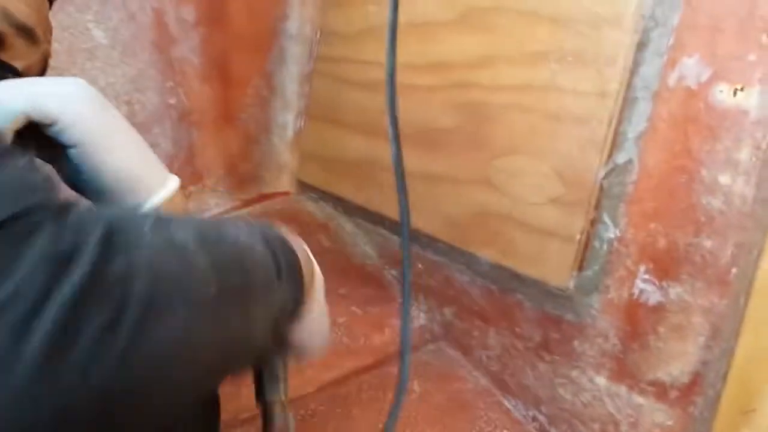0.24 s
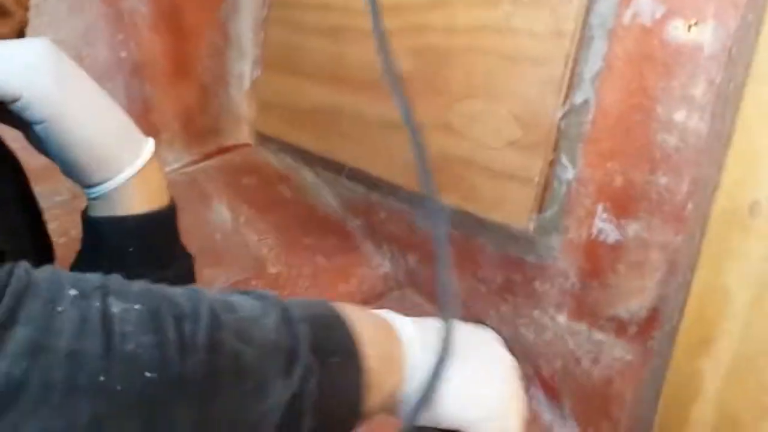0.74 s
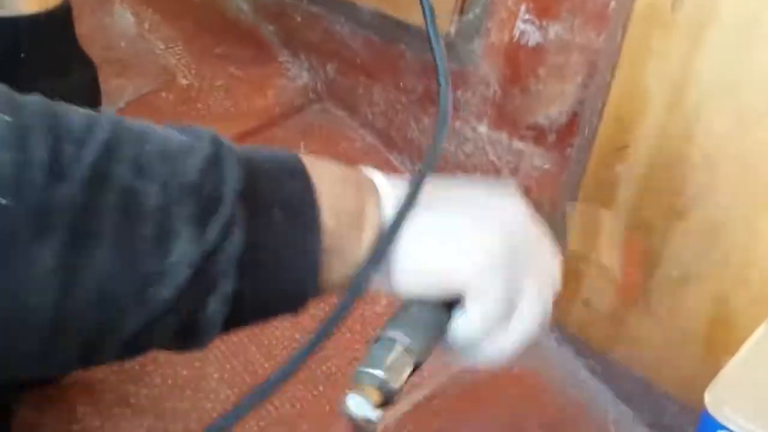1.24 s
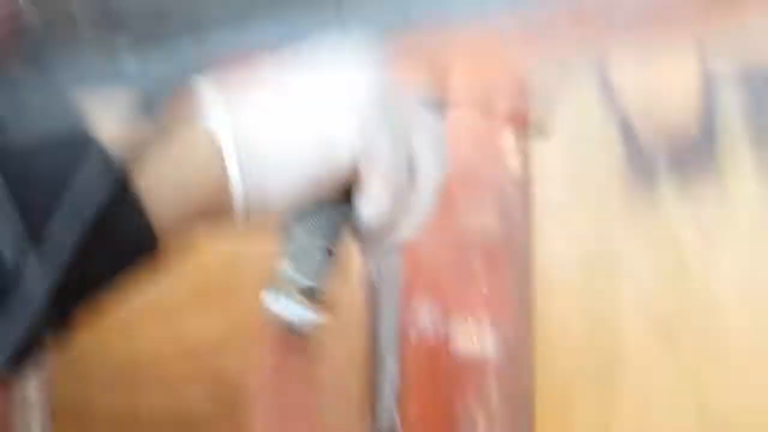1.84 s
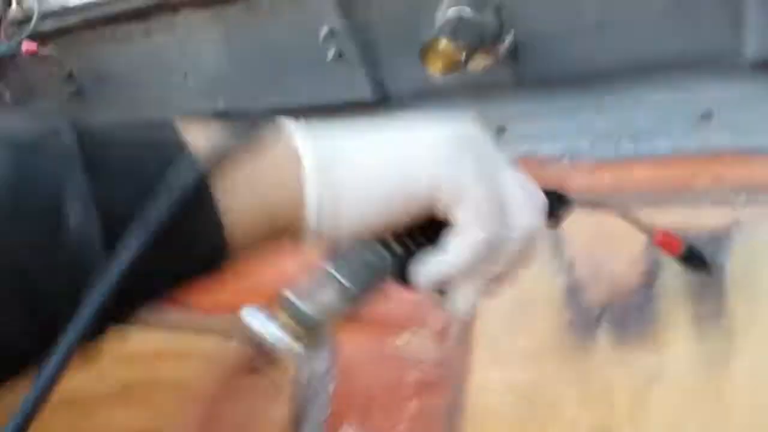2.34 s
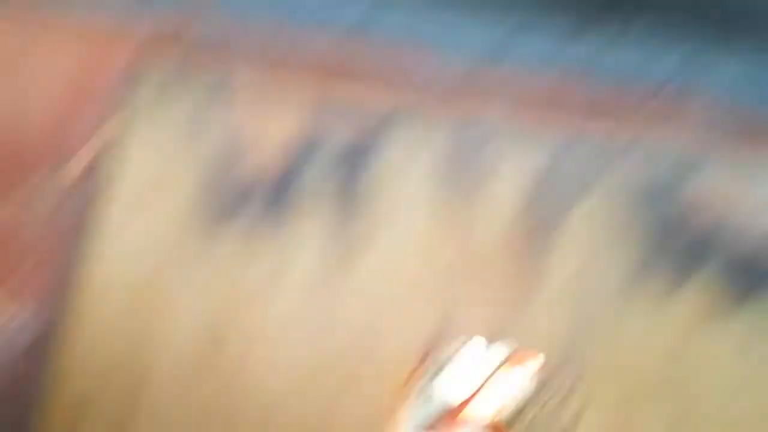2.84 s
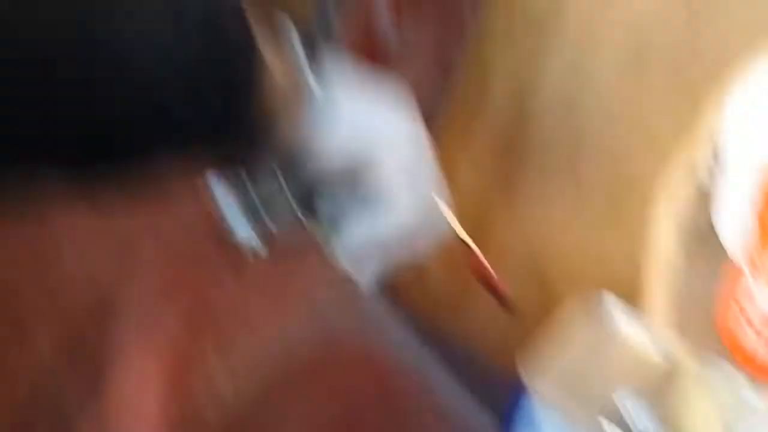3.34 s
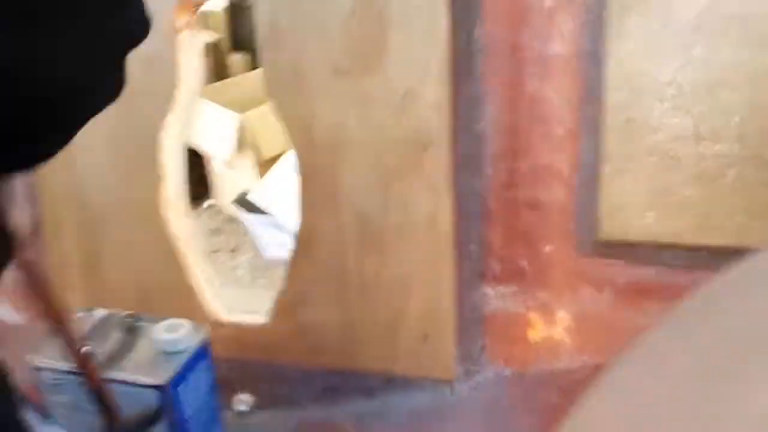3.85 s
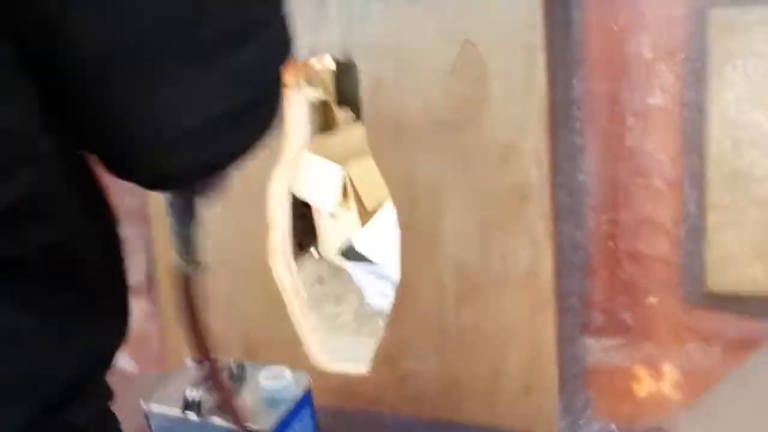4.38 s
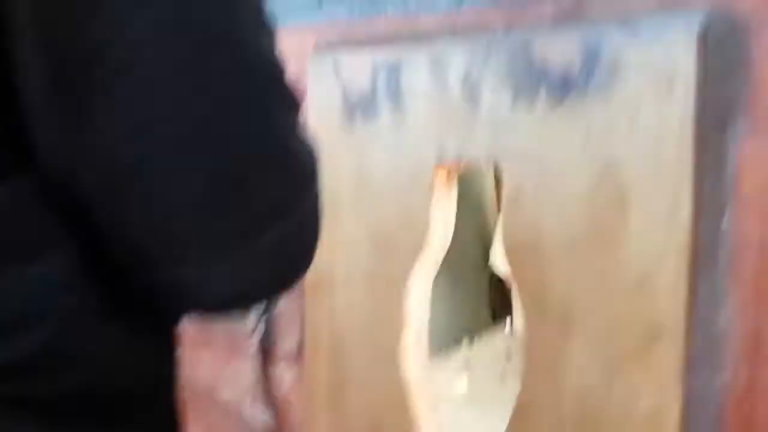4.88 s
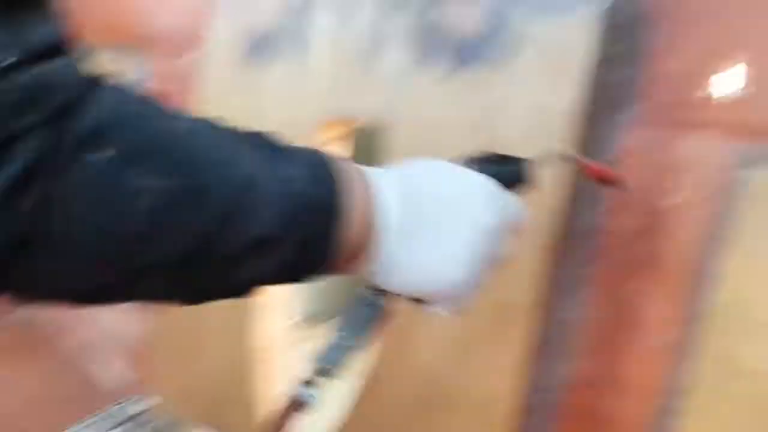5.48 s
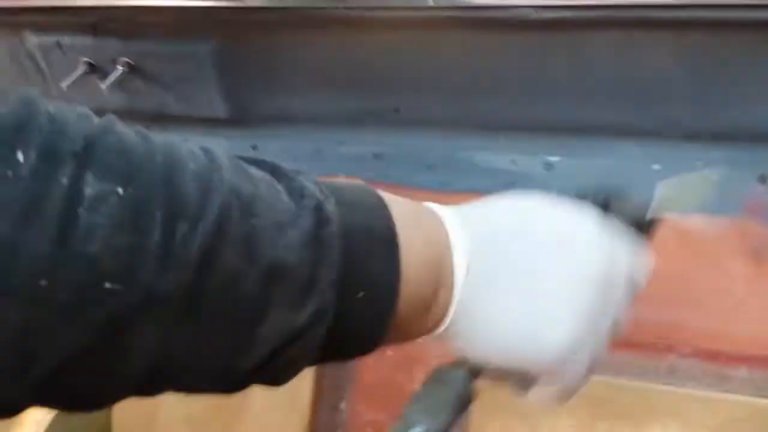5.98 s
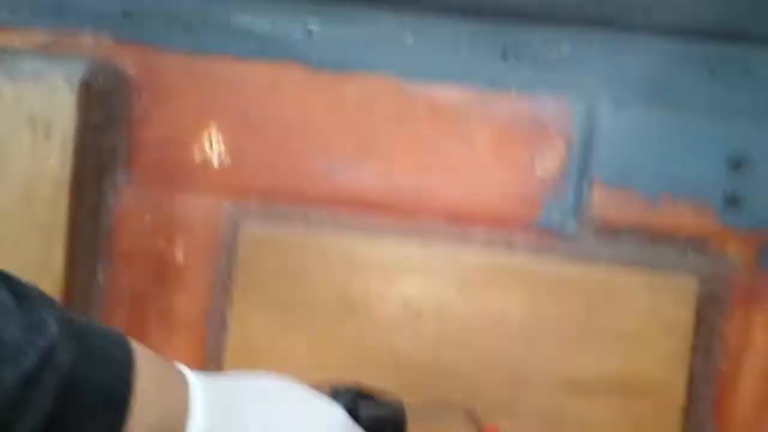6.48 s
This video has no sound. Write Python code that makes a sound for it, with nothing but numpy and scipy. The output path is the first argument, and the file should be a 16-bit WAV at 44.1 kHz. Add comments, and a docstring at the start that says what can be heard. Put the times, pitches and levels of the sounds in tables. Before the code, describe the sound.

Close in a workshop, a compressed-air gun hisses loudly and brightly, mostly on the left. It starts shrill at holes, then sweeps corners with hollow whooshes, brief whistly rings and spitting puffs, while air flaps and thumps on the stereo microphone. The trigger is released, sound vanishes for an instant, then a weaker steady hiss resumes with cloth rustles, faint wavering hum and low burbling noise.

```python
"""Blow-gun on a panelled surface

Workshop, close perspective, stereo microphones: a blow-gun sweeps dust from holes and corners near the left one.
The jet is patchy shaped noise; it rings in holes and hollows through resonances, and puffs at rims.
Its deflected air flaps on the microphone as ragged pulses; sleeves rub as short noise strokes, bumps as low knocks.
The sound drops out briefly, then the gun blows on; a wavering machine hum joins a faint, patchy low noise bed.
Scattered short low blips accompany both blasts."""
import sys
import numpy as np
from scipy import signal
from scipy.fft import rfft, irfft, next_fast_len
from scipy.io import wavfile
from scipy.ndimage import uniform_filter1d, map_coordinates

SR = 44100
rng = np.random.default_rng(int(sys.argv[2]) if len(sys.argv) > 2 else 0)


def master_out(mix):
    """Clip the mix to full scale and print it as 16-bit PCM to the path in sys.argv[1]."""
    frames = np.transpose(np.atleast_2d(mix))
    ceiling = np.clip(frames, -1, 1)
    pcm = np.round(ceiling * 32767).astype(np.int16)
    wavfile.write(sys.argv[1], SR, pcm)


N = 296352

# Levels and lull depths are relative: each layer adds its own mix offset or scale.
# The jet over the surface, one list per blast: start_s, hiss_db, sheen_db (top octave), splash_db
JET_BLASTS = [
    [(0, -38, -37.5, -33.5), (.35, -36, -44.5, -38.5), (.45, -37, -39, -36), (.82, -31.5, -37, -34.5),
     (1.0, -37, -43.5, -44), (1.2, -39.5, -41.5, -36.5), (1.38, -40, -38.5, -38), (2.05, -41, -38, -39),
     (2.5, -38.5, -43, -37.5), (2.78, -41.5, -45.5, -44.5), (2.95, -41, -44, -37), (3.11, -39.5, -35, -40),
     (3.33, -44.5, -41.5, -40), (3.44, -37.5, -41, -37), (3.51, -43, -47, -40)],
    [(3.72, -47.5, -41, -44.5), (3.9, -45.5, -43, -46), (4.3, -45.5, -43, -44), (4.62, -46.5, -45.5, -49),
     (4.8, -46, -47, -56), (5.12, -46.5, -47.5, -62.5), (5.23, -43, -41, -47), (5.42, -42.5, -45.5, -50.5),
     (5.58, -42, -40, -43), (5.93, -41.5, -37, -46), (6.2, -40.5, -37, -45.5), (6.72, -41.5, -43.5, -51)],
]
# Nozzle held right at a hole, shrill hiss: start_s, length_s, level_db
HOLE_EDGES = [(-.05, .44, -24.5), (.39, 0.33, -23.5), (.697, .425, -24.5)]
# The jet catches a rim: start_s, length_s, level_db
RIM_SPURTS = [(0.385, 0.025, -27), (0.48, 0.021, -29), (0.555, 0.02, -44), (0.615, 0.015, -30),
              (1.528, 0.025, -24.5), (3.285, 0.0074, -33.5), (6.11, 0.13, -51), (6.635, 0.026, -38)]
# The nozzle lifts off and the hiss sinks: start_s, length_s, depth_db
NOZZLE_LULLS = [(0.657, 0.047, 7), (1.282, 0.036, 3), (1.405, .118, 4.5), (1.952, .09, 1.5),
                (2.806, 0.039, 0.5), (3.007, 0.15, 1)]
# Direction of the jet: time_s, left_over_right_db
JET_DIRECTION = [(0, 9.5), (1.1, 11), (1.7, 13), (2.1, 11), (3.8, 11.5), (5.8, 13.5), (6.72, 14)]
# The jet sweeps through a corner or hollow: start_s, length_s, level_db
HOLLOW_SWEEPS = [(0.067, .07, -36.5), (0.403, 0.082, -37.5), (0.56, 0.067, -39), (0.71, .1, -39.5),
                 (0.875, 0.12, -36.5), (1.021, 0.12, -29.5), (1.17, 0.13, -44), (1.375, 0.047, -45),
                 (1.468, 0.041, -36.5), (1.526, 0.079, -37), (2.65, 0.081, -42.5), (2.896, 0.083, -32.5),
                 (3.263, 0.16, -41), (4.598, 0.042, -40), (5.153, 0.039, -49), (5.431, 0.18, -52),
                 (5.992, 0.085, -47), (6.121, 0.063, -44.5), (6.26, 0.028, -51.5), (6.367, 0.04, -51)]
# Air stirring in the corners between sweeps: time_s, level_db
CORNER_STIR = [(0, -44), (.3, -59), (1.2, -50), (1.95, -52), (3.5, -45.5), (3.72, -58.5), (4.2, -96),
               (5.1, -59), (5.6, -55), (6.3, -57.5), (6.72, -62.5)]
# Holes that ring as the jet crosses them: start_s, length_s, base_pitch_hz, level_db
RINGING_HOLES = [(1.044, .075, 888, -33), (1.118, 0.16, 2723, -34), (2.847, 0.12, 1724, -39),
                 (3.277, 0.021, 2810, -28), (3.444, .016, 2474, -29.5), (5.165, 0.025, 621, -41.5)]
# Modes of a hole: frequency_ratio (to the base pitch), level_db
RING_MODES = [(1.001, 7.5), (1.33, 3), (1.52, 7), (2.2, 3.5)]
# Resonances of the corner: centre_hz, width_hz, level_db
CORNER_RESONANCES = [(1450, 110, -11.5), (2146, 100, -1), (2770, 36, 11), (3330, 530, -2.5),
                     (5000, 480, -16.5), (6200, 92, -2)]
# Deflected air hits the microphone: start_s, length_s, level_db
MIC_GUSTS = [(.66, 0.027, -50), (1.316, 0.027, -37), (1.358, .016, -42), (1.383, 0.021, -40.5),
             (1.564, 0.0084, -37), (1.64, 0.016, -44), (1.693, 0.072, -46.5), (1.778, 0.015, -35),
             (1.863, 0.041, -35.5), (1.921, 0.016, -40), (2.101, 0.02, -38.5), (2.168, 0.017, -44),
             (2.2, 0.068, -40), (2.279, .03, -37.5), (2.64, .012, -35.5), (2.988, 0.016, -29.5),
             (3.152, 0.014, -32.5), (3.202, .056, -36.5), (5.56, 0.016, -44.5), (5.758, 0.018, -40),
             (5.899, .016, -39.5), (6.473, 0.023, -45)]
# Single slaps of air on the microphone: start_s, level_db
AIR_SLAPS = [(1.322, -14.5), (1.395, -24), (1.562, -18), (1.783, -21), (1.877, -20), (1.9, -22),
             (2.254, -20), (2.336, -27), (2.993, -42), (3.154, -21), (3.243, -19), (5.768, -33)]
# Low blips and rumble under the first blast: time_s, level_db
UNDERTONE_LEVEL = [(.35, -105), (.6, -62), (1.2, -65.5), (1.5, -49), (2.0, -68.5), (2.5, -52.5),
                   (3.1, -63.5), (3.35, -50.5), (3.5, -70)]
# Sleeve strokes: start_s, length_s, body_db, swish_db
SLEEVE_RUBS = [(0.107, 0.039, -55, -41), (3.718, 0.028, -58, -29.5), (4.326, 0.018, -49, -30.5),
               (4.603, 0.049, -50.5, -41.5), (5.157, 0.035, -42.5, -41.5), (5.52, 0.048, -53, -33.5),
               (5.843, 0.0087, -38, -57)]
# Dull bumps: start_s, pitch_hz, level_db
DULL_BUMPS = [(0.534, 152, -45), (0.666, 183.3, -32)]
# Spells of machine hum: start_s, length_s, pitch_hz, level_db
HUM_SPELLS = [(4.172, 0.04, 227.6, -58), (4.319, 0.047, 219.7, -51.5), (4.498, 0.555, 220.7, -56),
              (5.256, 0.53, 203, -67.5)]
# Faint low noise bed with blips: time_s, level_db
BED_LEVEL = [(3.72, -67), (4.1, -64.5), (4.5, -62), (5.2, -63.5), (5.9, -58.5), (6.3, -67), (6.72, -72)]

# Spectral shapes, all with columns: frequency_hz, density_db (per Hz, relative)
# Jet: nozzle hiss, its top octave, splash on the surface, rush over a hole's edge, puff at a rim
HISS_SPECTRUM = [(1700, -99), (2600, -34), (3600, -23), (5200, -2.5), (7300, 1.5), (9500, 0.5),
                 (12000, 1.5), (14000, -1.5), (16000, -21.5)]
SHEEN_SPECTRUM = [(5000, -104), (8000, -28.5), (11500, -10), (13500, -5), (15400, 4), (16000, -14.5)]
SPLASH_SPECTRUM = [(1650, -90), (2100, -5.5), (2400, -3.5), (2800, 0), (4200, 3), (5200, 3), (7500, -16.5)]
SHRILL_SPECTRUM = [(2000, -98), (4000, -58.5), (7500, -14), (9000, -7.5), (10300, -1.5), (11300, -3),
                   (12600, -7), (14500, -15.5)]
SPURT_SPECTRUM = [(800, -78), (2000, -5.5), (4000, -6), (9000, -3), (15000, 0)]
# Air moving in a corner
CORNER_SPECTRUM = [(300, -70), (600, -20), (950, -10), (1250, 0), (2100, 1), (3200, -9)]
# Gusts at the microphone: low pressure and its hissing spray
BUFFET_SPECTRUM = [(25, -29), (80, -18), (200, -3.5), (450, -0.5), (900, -3), (1500, -10.5), (3000, -20),
                   (8000, -34.5)]
SPRAY_SPECTRUM = [(400, -18.5), (1200, -2.5), (2200, -4.5), (5000, -9), (9000, -13.5), (16000, -46.5)]
# Weak rumble under the first blast
RUMBLE_SPECTRUM = [(25, -5.5), (80, -3.5), (200, 5), (500, -2.5), (1100, -25), (2500, -76.5)]
# Cloth: soft body and grainy swish
SLEEVE_SPECTRUM = [(80, -41), (230, -14), (550, 10.5), (900, 5), (2000, -50)]
SWISH_SPECTRUM = [(500, -19), (1200, -5.5), (2500, -0.5), (4500, -2), (8000, -17), (16000, -35)]
# Faint low noise bed
BED_SPECTRUM = [(25, -14), (100, -13), (180, 0.5), (450, -11.5), (750, -8.5), (1050, -10.5), (1400, -31),
                (3000, -66)]

RELEASE_S, DROPOUT_S, RESUME_S = 3.515, 3.6, 3.705  # trigger let go, sound lost, both back
TOP_HZ = 15900  # band limit
FLAP_START_S, FLAP_PERIOD_S, FLAP_LENGTH_S = 2.316, .0542, .038  # the air flaps regularly for a moment
FLAP_DB, FLAP_SPRAY_DB, GUST_SPRAY_DB = -32.5, -2.5, -6.5  # flap level; spray envelopes relative to the low part
SHEEN_LEFT_DB = 6.5  # extra left-over-right level of the top octave
BUFFET_LEFT_DB, HOLLOW_LEFT_DB = 44, 4.5  # left over right: gusts reach almost only the left port
SWEEP_CREST_DB, SWEEP_WIDTH = -1, 0.56  # added at mid-sweep; half-width as a share of the length


def jet():
    """Turbulent hiss of the nozzle, its splash on the surface, and the shrill rush over the edge of a hole."""
    hiss_db, sheen_db, splash_db = curves(np.vstack(JET_BLASTS))
    left_db, = curves(JET_DIRECTION)
    hiss = amp(hiss_db + 5.0) * coloured(eddies(patchy_db=4.5), HISS_SPECTRUM)
    sheen_level = amp(sheen_db + 4.5 + 1.0 * wobble(10))
    sheen = sheen_level * coloured(eddies(patchy_db=-4.0), SHEEN_SPECTRUM)
    surface_level = amp(splash_db - 2.5 + 0.5 * wobble(20) - 0.6 * lulls())
    splash_level = np.hypot(surface_level, amp(-5.0) * sweeps())  # hollows splash more
    splash = splash_level * coloured(eddies(patchy_db=10.0), SPLASH_SPECTRUM)
    at_hole = bursts(HOLE_EDGES, edge_s=0.013)
    edge = at_hole * coloured(eddies(patchy_db=-1.5), SHRILL_SPECTRUM)
    flutter = amp(1.11 * wobble(30) + 0.53 * wobble(250) - lulls())  # the jet flaps as a whole
    core = place(hiss + edge, left_db, alike=0.033)
    top = place(sheen, left_db + SHEEN_LEFT_DB, alike=.15)  # the top octave is set further left
    return flutter * (core + top + place(splash, 7.6, alike=0.12))


def lulls():
    """How far the jet sinks while the nozzle is off the surface, in dB before each layer's scale."""
    return sum(depth * bursts([(s, length, 0)], edge_s=0.0071) for s, length, depth in NOZZLE_LULLS)


def sweeps():
    """Air in a hollow swells as the jet nears its middle and fades as it leaves."""
    t, level = clock(), np.zeros(N)
    for s, length, db in HOLLOW_SWEEPS:
        from_middle = (t - s - length / 2) / (SWEEP_WIDTH * length)
        level += amp(db + SWEEP_CREST_DB) * np.exp(-np.abs(from_middle) ** 3)
    return level


def spurts():
    """Sudden bright puffs of noise as the jet catches a rim."""
    puffs = bursts(RIM_SPURTS, edge_s=.001) * coloured(rng.standard_normal((2, N)), SPURT_SPECTRUM)
    return amp(0.5) * place(puffs, 14, alike=.3)


def hollows():
    """The jet drives the broad resonances of the corner, and now and then the narrow ones of a hole."""
    stir_db, = curves(CORNER_STIR)
    drive_level = amp(stir_db + 2.3 * wobble(14) - 4.6 * lulls()) + sweeps()
    stir = coloured(eddies(patchy_db=14), CORNER_SPECTRUM)
    ring_drive = coloured(eddies(patchy_db=12.5), [(500, -68.0), (1200, 2.5), (6000, -9.5), (12000, -20.5)])
    ring = resonate(ring_drive, CORNER_RESONANCES)
    flutter = amp(0.82 * wobble(22) + 2.7 * wobble(160))
    air = drive_level * flutter * (amp(-0.5) * stir + amp(-9) * ring)
    for s, length, hz, db in RINGING_HOLES:
        modes = [(hz * ratio, 70, level) for ratio, level in RING_MODES]
        # the falling frequency order is deliberate: it sets the low cut of the drive
        drive = coloured(rng.standard_normal((2, N)), [(hz * 0.78, -40), (hz * 0.51, 0)])
        air += bursts([(s, length, db)], edge_s=0.02) * resonate(drive, modes)
    return place(air, HOLLOW_LEFT_DB, alike=0.43)


def buffeting():
    """Gusts break on the ports as a ragged run of pressure pulses, with a spray of hiss and single slaps."""
    gusts = bursts(MIC_GUSTS, edge_s=0.0039)
    flapping = bursts(flaps(count=6), edge_s=0.0053)
    hits = rng.random((2, N)) < 800 / SR  # about 800 pulses a second
    pulses = np.sign(rng.standard_normal((2, N))) * hits
    ragged = amp(3.2 * wobble(200))
    low = (gusts + flapping) * coloured(ragged * pulses, BUFFET_SPECTRUM)
    spray_level = amp(GUST_SPRAY_DB) * gusts + amp(FLAP_SPRAY_DB) * flapping
    spray = spray_level * unit(ragged * coloured(eddies(patchy_db=3.5), SPRAY_SPECTRUM))
    slaps, t = np.zeros(N), np.arange(SR // 50) / SR
    u = t / 0.00033
    for s, db in AIR_SLAPS:
        slaps[round(s * SR):][:len(t)] -= amp(db) * (1 - u) * np.exp(-u)  # a push, then suction
    return place(low + amp(3.0) * spray, BUFFET_LEFT_DB, alike=.3) + slaps * amp([[5], [-10]])


def flaps(count):
    """A run of equal gusts at a steady rate: start_s, length_s, level_db."""
    return [(FLAP_START_S + k * FLAP_PERIOD_S, FLAP_LENGTH_S, FLAP_DB) for k in range(count)]


def sleeves():
    """Cloth drags over cloth: a soft body and a grainy swish."""
    rubs = np.array(SLEEVE_RUBS)
    body = bursts(rubs[:, [0, 1, 2]], edge_s=0.01) * coloured(eddies(patchy_db=5.0), SLEEVE_SPECTRUM)
    grain = unit(amp(1.2 * wobble(360)) * coloured(eddies(patchy_db=14.0), SWISH_SPECTRUM))
    swish = bursts(rubs[:, [0, 1, 3]], edge_s=0.012) * grain
    return place(amp(4.5) * body + amp(-4.0) * swish, 1.3, alike=0.48)


def bumps():
    """Soft contacts give a short, low knock: a decaying sine with a soft onset."""
    out, t = np.zeros(N), np.arange(SR // 8) / SR
    for s, hz, db in DULL_BUMPS:
        envelope = amp(db - 60 * t / 0.041) * (1 - np.exp(-t / 0.00093))  # falls 60 dB in 41 ms
        out[round(s * SR):][:len(t)] += envelope * np.sin(2 * np.pi * hz * t)
    return out * amp([[2.5], [-2.5]])


def machine_hum():
    """A machine hums in spells: a wavering tone with a faint second harmonic."""
    hz, = curves([(s + length * end, pitch) for s, length, pitch, db in HUM_SPELLS for end in (0, 1)])
    phase = 2 * np.pi * np.cumsum(hz * (1 + 0.0134 * wobble(44))) / SR
    spells = bursts([(s, length, db) for s, length, pitch, db in HUM_SPELLS], edge_s=0.0053)
    tone = np.sin(phase) + amp(-23) * np.sin(2 * phase)
    hum = spells * amp(3.5 * wobble(28)) * tone * np.sqrt(2)
    return hum * amp([[1.2], [-1.2]])


def low_undertone():
    """Faint low blips and a weak rumble accompany the first blast."""
    level_db, = curves(UNDERTONE_LEVEL)
    level = amp(level_db - 0.93 * lulls()) * (clock() < RELEASE_S)
    blips = np.array([low_blips(rate=100, low_hz=327.5, high_hz=1134) for side in "LR"])
    rumble = unit(amp(11 * wobble(60)) * coloured(eddies(patchy_db=5), RUMBLE_SPECTRUM))
    return level * (amp(2.5) * place(blips, 8.9, alike=0.95) + amp(-15.5) * place(rumble, 7.3, alike=0.37))


def low_bed():
    """A faint, patchy low noise bed with scattered short low blips, rising after the first blast has ended."""
    blips = np.array([low_blips(rate=60, low_hz=273.6, high_hz=993) for side in "LR"])
    bed = amp(-3.5) * coloured(eddies(patchy_db=8), BED_SPECTRUM) + amp(3.5) * blips
    presence = np.interp(clock(), [RELEASE_S, RESUME_S], [0, 1])
    return place(amp(curves(BED_LEVEL)[0]) * presence * bed, 2.9, alike=0.48)


def low_blips(rate, low_hz, high_hz):
    """Short low blips at scattered pitches, rate a second, at rms 1."""
    count = int(rate * N / SR)
    when, pitch, size, life = rng.random((count, 4)).T[..., None]
    t = np.arange(-SR // 40, SR // 40) / SR
    hz = low_hz * (high_hz / low_hz) ** pitch
    swell = np.exp(-(t / (0.0011 + 0.0064 * life)) ** 2)
    blips = amp(10 * size) * swell * np.sin(2 * np.pi * hz * t)
    index = (when * N).astype(int) + np.arange(len(t))
    return unit(np.bincount(index.ravel(), blips.ravel(), N)[:N])


def amp(db):
    """Decibels to amplitude."""
    return 10 ** (np.asarray(db) / 20)


def unit(x):
    """x scaled to rms 1."""
    return x / np.sqrt(np.mean(x ** 2) + 1e-20)


def clock():
    """Time of every sample, in seconds."""
    return np.arange(N) / SR


def along(points, hz):
    """Values of (Hz, value) points, joined on a log frequency axis."""
    f, v = np.transpose(points)
    return np.interp(np.log(hz + 1), np.log(f + 1), v)


def curves(rows):
    """One value per sample for each column after the time."""
    s, *cols = np.transpose(rows)
    return [np.interp(clock(), s, c) for c in cols]


def wobble(rate):
    """A random curve of straight segments, rate knots a second."""
    return map_coordinates(rng.standard_normal(int(N * rate / SR) + 4), [clock() * rate], order=1)


def filtered(x, response):
    """x times a complex response of frequency."""
    m = next_fast_len(N + 8192)
    return irfft(rfft(x, m) * response(np.fft.rfftfreq(m, 1 / SR)), m)[..., :N]


def coloured(x, spectrum):
    """x shaped by the given spectrum, at rms 1."""
    return unit(filtered(x, lambda hz: amp(along(spectrum, hz))))


def resonate(x, modes):
    """x through parallel (Hz, width Hz, dB) resonances, at rms 1."""
    def response(f):
        return sum(amp(db) * 1j * f * w / (c * c - f * f + 1j * f * w) for c, w, db in modes)
    return unit(filtered(x, response))


def eddies(patchy_db):
    """Noise for two microphones with shared patches in time and frequency; positive depth favours dips."""
    z = signal.stft(rng.standard_normal((2, N)), nperseg=1024)[2]
    field = uniform_filter1d(rng.standard_normal(z.shape[1:]), size=4, axis=0)
    field = uniform_filter1d(field, size=3, axis=1)
    patches = amp(patchy_db * np.minimum(unit(field), 1))
    return unit(signal.istft(z * patches, nperseg=1024)[1][:, :N])


def place(pair, left_db, alike=0.1, lead_s=0.0001):
    """Two unrelated signals as a source on the left: the right is weaker and shares the direct sound, delayed."""
    alike = np.clip(alike, 0, .98)
    direct = filtered(pair[0], lambda hz: np.exp(-2j * np.pi * hz * lead_s))
    right = alike * direct + np.sqrt(1 - alike ** 2) * pair[1]
    ratio = amp(-left_db)
    return np.array([pair[0], ratio * right]) * 2 / np.sqrt(1 + ratio ** 2)


def bursts(rows, edge_s):
    """Envelope of (start_s, length_s, level_db) bursts with soft flanks."""
    out, t = np.zeros(N), clock()
    for s, length, db in rows:
        near = slice(max(0, int((s - .1) * SR)), int((s + length + .1) * SR))
        rise = np.tanh((t[near] - s) / edge_s)
        fall = np.tanh((t[near] - s - length) / edge_s)
        out[near] += amp(db) * (rise - fall) / 2
    return out


def scene():
    """Letting go of the trigger leaves only a thin leak of air until the gun blows on."""
    trigger_s = [RELEASE_S, RELEASE_S + 0.028, RESUME_S, RESUME_S + 0.01]
    trigger_db = np.interp(clock(), trigger_s, [-0.5, -21.5, -18, 2])
    air = amp(trigger_db) * (jet() + hollows()) + spurts() + buffeting()
    return air + sleeves() + bumps() + machine_hum() + low_undertone() + low_bed()


def record(dry):
    """The sound drops out for a moment; nothing is kept above the band limit."""
    fade_s = [DROPOUT_S - .005, DROPOUT_S + .003, RESUME_S - .002, RESUME_S + .005]
    live = np.interp(clock(), fade_s, [1, 0, 0, 1])
    return filtered(dry * live, lambda hz: hz < TOP_HZ)


dry = scene()
out = record(dry)
master_out(out)
```